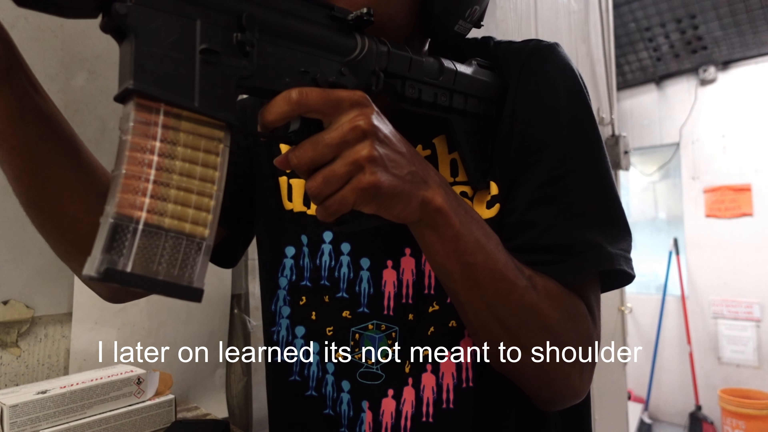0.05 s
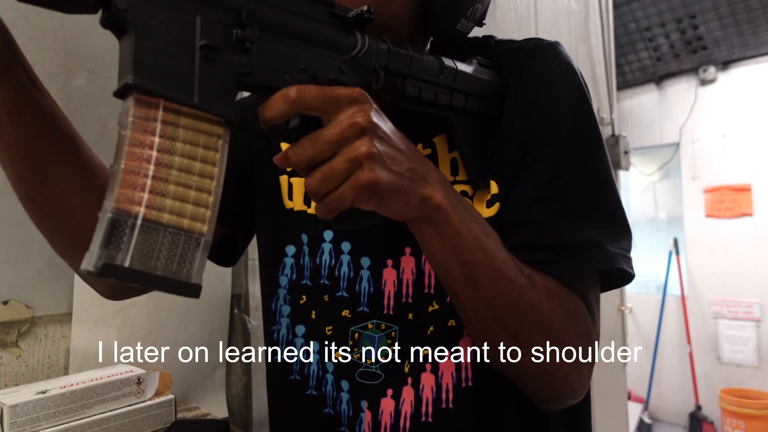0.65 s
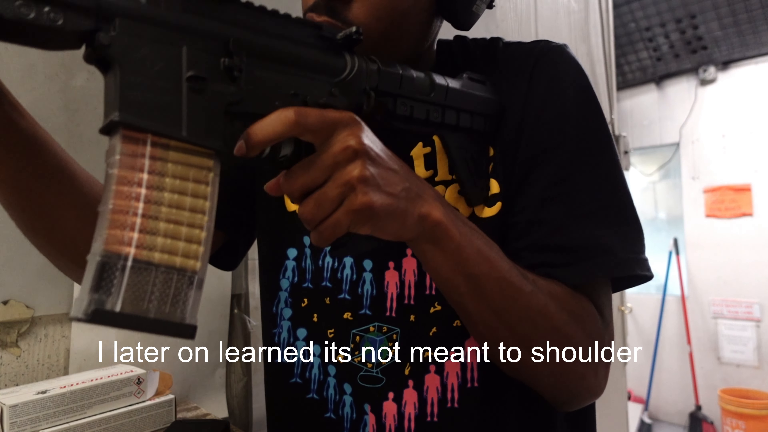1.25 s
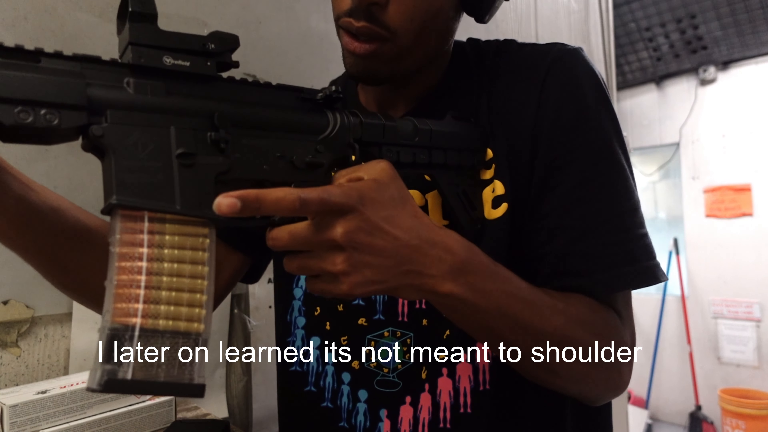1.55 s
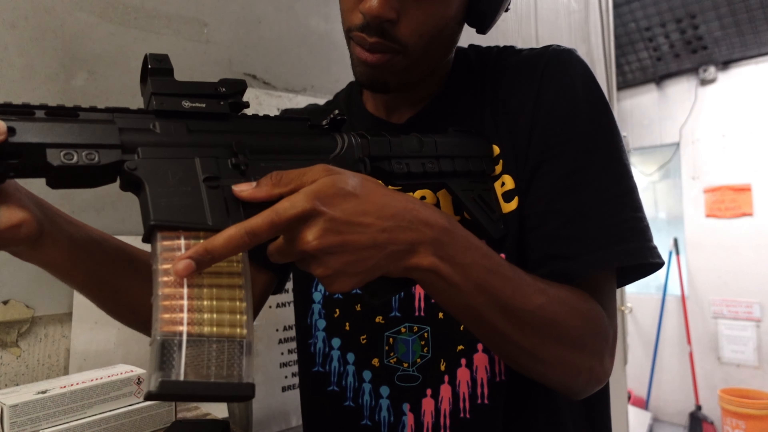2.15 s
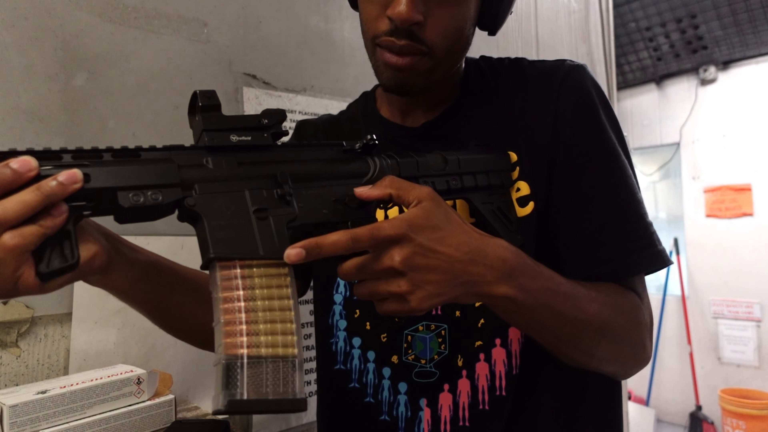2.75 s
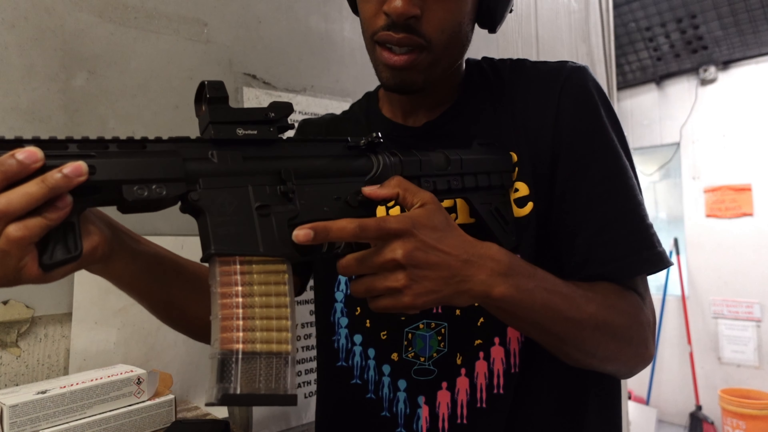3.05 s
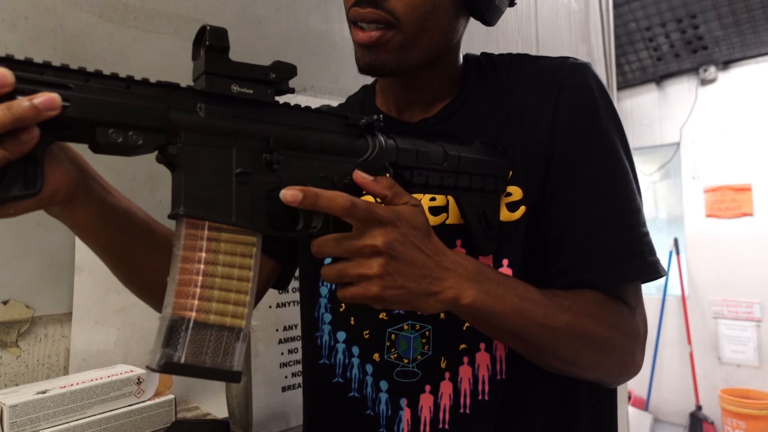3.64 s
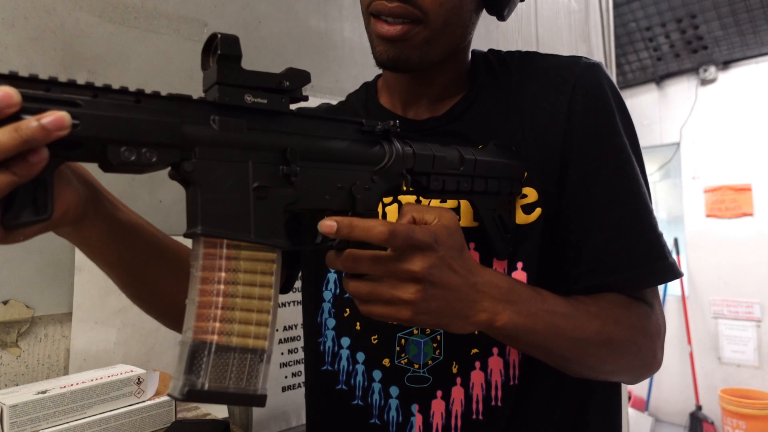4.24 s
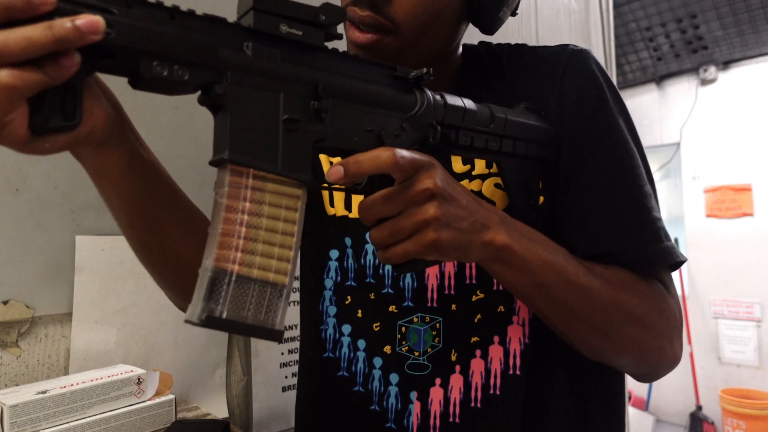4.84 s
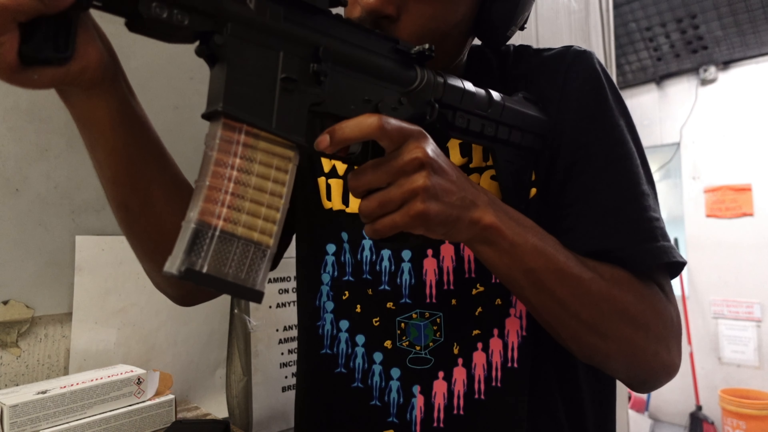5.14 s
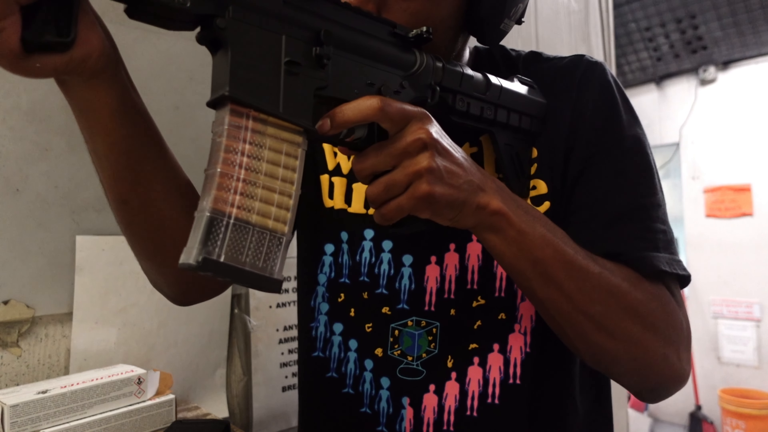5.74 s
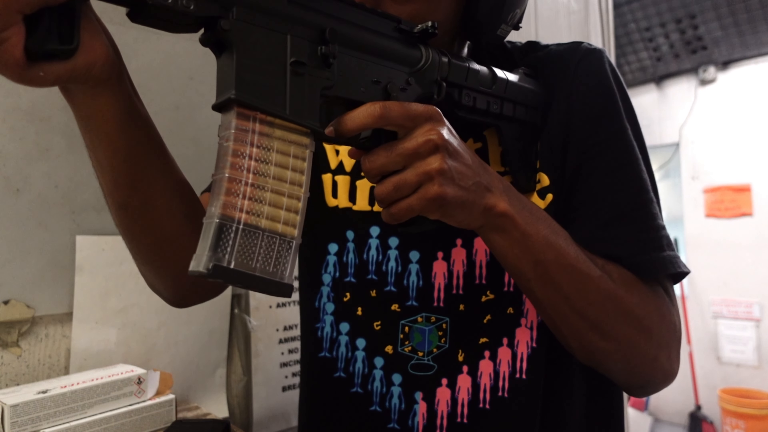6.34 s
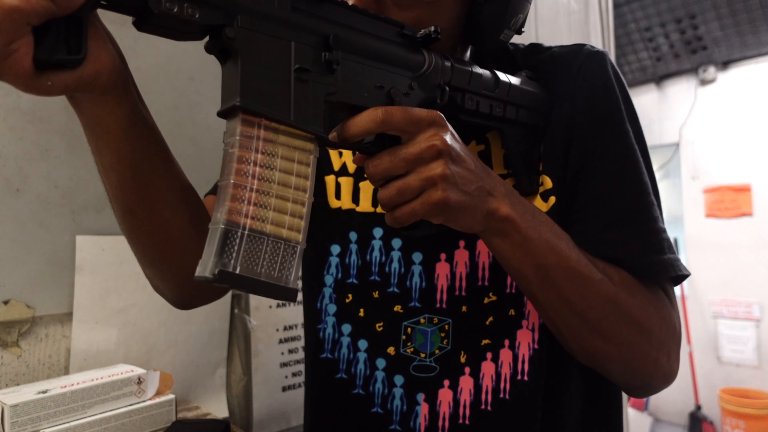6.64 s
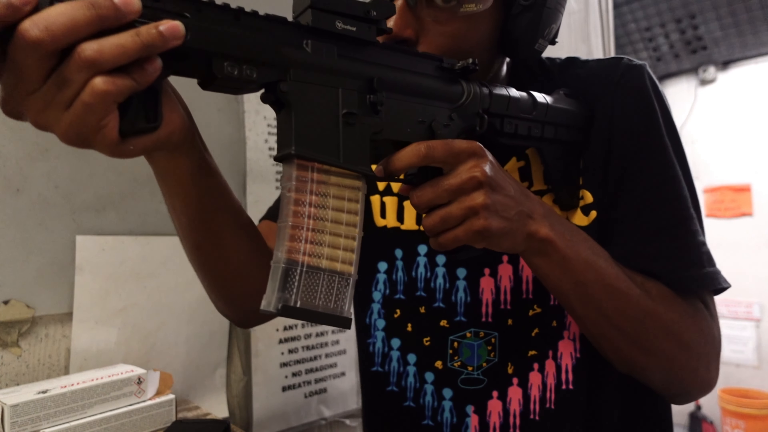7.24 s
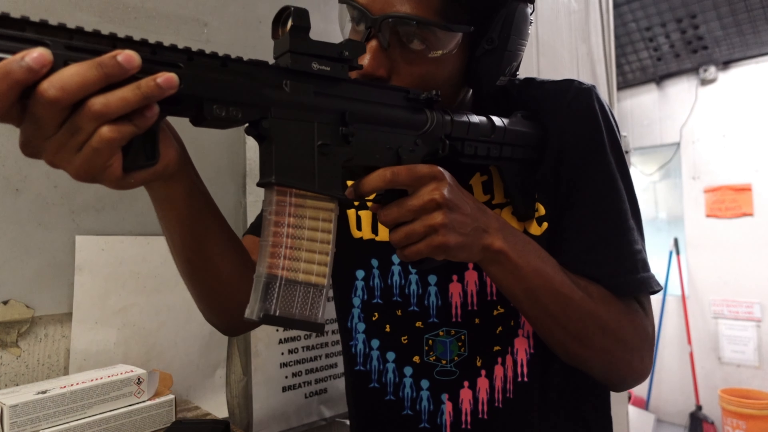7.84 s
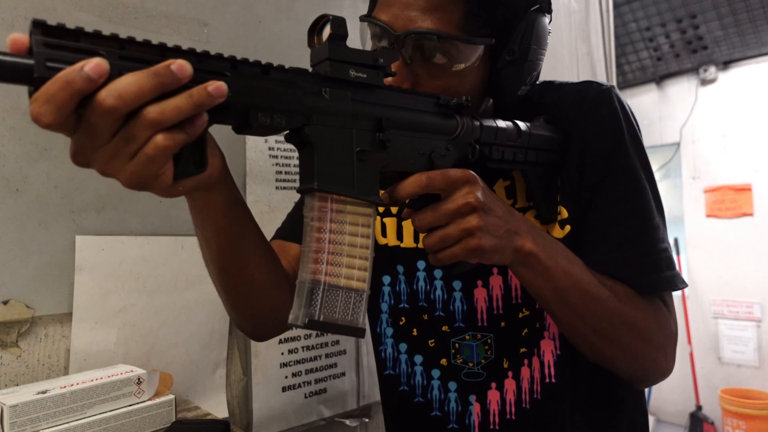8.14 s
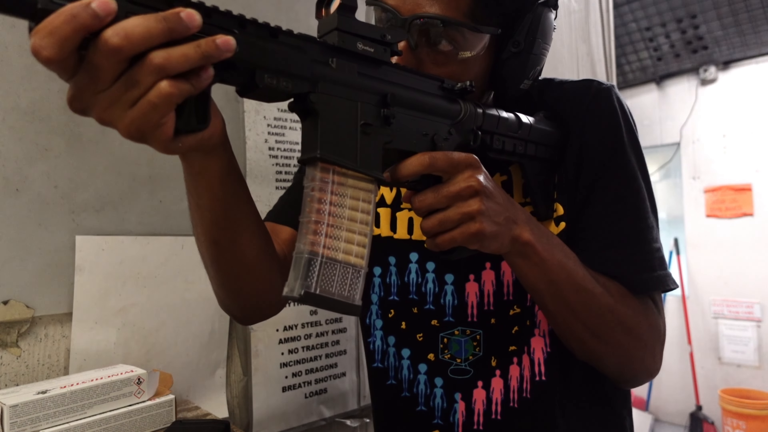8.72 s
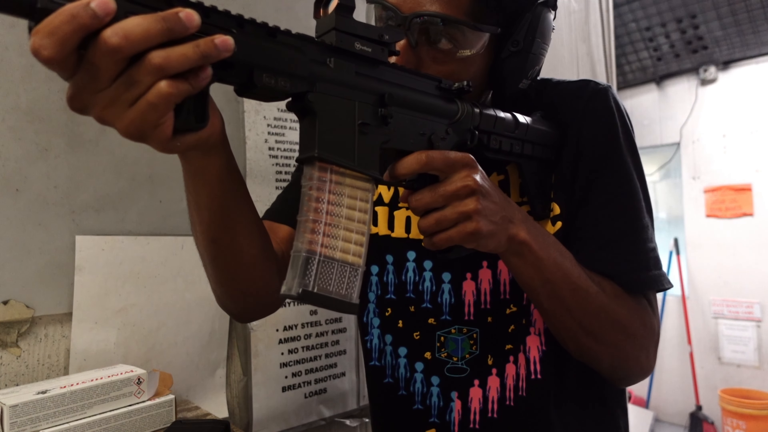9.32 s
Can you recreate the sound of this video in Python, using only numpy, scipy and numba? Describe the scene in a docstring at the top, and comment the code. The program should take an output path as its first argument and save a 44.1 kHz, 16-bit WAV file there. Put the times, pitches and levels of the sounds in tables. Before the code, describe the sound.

Over a low fan hum and rushing ducts, a rifle is handled with faint swishes and light metal ticks. A crisp click of the safety comes just before a very loud shot, and a second shot follows some three seconds later. The microphone sits beside the shooter in an indoor range, so both blasts distort and crackle for over a second as their long echoes die away.

```python
"""Ventilation hums and rushes in the booth of an indoor range, heard through one microphone by the shooter.
Close by, hands and shirt brush the rifle, small metal parts tick, and the safety snaps off.
Two shots follow, about three seconds apart. Each blast fills the concrete hall and overloads the
microphone for over a second; the recorder's gain control ducks and then creeps back up."""
import sys
import numpy as np
from scipy import signal
from scipy.fft import rfft, irfft, next_fast_len
from scipy.io import wavfile
from scipy.ndimage import map_coordinates
from numba import njit

SR = 44100
rng = np.random.default_rng(int(sys.argv[2]) if len(sys.argv) > 2 else 0)


def dump_mix(stems):
    """Bounce the given channels to the path in sys.argv[1] as a 16-bit WAV at rate SR."""
    frames = np.atleast_2d(stems).T  # one column per channel
    limited = np.clip(frames, -1, 1)  # hard clip at full scale
    pcm = np.round(limited * 32767).astype(np.int16)
    wavfile.write(sys.argv[1], SR, pcm)


N = 418068
TIME = np.arange(N) / SR

# Fan motor and blade tones in the booth. Each row: frequency in Hz, rms level at the microphone in dB.
FAN_TONES = [(120, -22.5), (178.7, -22), (240.3, -46), (298.8, -41), (419.9, -45.5), (445.8, -40),
             (479.5, -51), (559.9, -47), (720, -47.5), (840, -55.5), (893, -52.5)]
# Air rushing through the ducts. Each row: frequency in Hz, relative spectral level in dB.
DUCT_SPECTRUM = [(25, -11), (70, -7), (150, -2), (230, -2), (420, -3), (600, -7), (1000, -9), (2000, -16),
                 (4000, -26.5), (8500, -35), (11000, -44), (15500, -45)]
# Hands and shirt brushing the rifle. Each row: time of the peak in seconds, level in dB.
BRUSHES = [(.17, -55), (.70, -53), (.81, -50), (.86, -47), (1.11, -55), (1.654, -54), (2.945, -50),
           (3.39, -56), (7.468, -52)]
# Light metal ticks on the rifle. Each row: start in seconds, level in dB, pitch in Hz.
TICKS = [(.155, -45, 4050), (.79, -47, 7800), (.964, -44, 3500), (6.988, -45, 8250)]
# The safety lever leaves one detent and drops into the next. Each row: start in seconds, level in dB.
SAFETY_CONTACTS = [(3.8934, -9.5), (3.897, -24), (3.9012, -32)]
# The steel receiver ringing. Each row: frequency in Hz, relative level in dB, 60 dB decay in seconds.
RECEIVER_MODES = [(2080, -7, .055), (2640, -9, .045), (4011, -14, .06), (4800, -9, 0.062), (5400, -2, .045),
                  (6250, -5, .04), (7900, -6, .04), (9071, -14, .05), (9700, -13, .035), (14320, -10, .04)]
# The lever's dry metal snap. Each row: frequency in Hz, relative spectral level in dB.
SNAP_SPECTRUM = [(1200, -42), (2000, -5), (3500, -7), (5500, -1.5), (8000, -3), (11000, -9.5), (15000, -8)]
# Shots fired from the booth. Each row: start in seconds, blast level in dB, air surge level in dB.
SHOTS = [(4.6994, 35.5, 11), (7.8439, 33.5, 10.5)]
# The blast as it fills the hall. Each row: frequency in Hz, relative spectral level in dB.
BLAST_SPECTRUM = [(30, -10), (120, -2), (220, -4.5), (330, 1.1), (550, 3), (800, 0.9), (1100, -2.5),
                  (1600, -3.5), (3500, -6.5), (7000, -9), (15000, -27)]
# Reverberation of the concrete hall. Each row: frequency in Hz, 60 dB decay in seconds.
HALL_DECAY = [(60, 1.45), (250, 2.35), (600, 2.485), (1400, 2.28), (2800, 1.963), (5000, 1.577),
              (8000, 1.265), (15000, 0.42)]
# The tone of the microphone. Each row: frequency in Hz, gain in dB.
MIC_RESPONSE = [(100, 0.66), (1000, -1), (4000, -1.8), (8000, -2.7), (12000, -2), (15500, -3.5)]


def amp(db):
    """Decibels to gain."""
    return 10 ** (np.asarray(db) / 20)


def unit(x):
    """Scale to rms 1."""
    return x / np.sqrt(np.mean(x ** 2) + 1e-20)


def along(points, hz):
    """Read (Hz, value) points on a log frequency axis."""
    freqs, values = np.transpose(points)
    return np.interp(np.log(hz + 1), np.log(freqs + 1), values)


def filtered(x, response):
    """Filter x by a gain given as a function of Hz."""
    size = next_fast_len(len(x) + SR // 2)
    hz = np.fft.rfftfreq(size, 1 / SR)
    return irfft(rfft(x, size) * response(hz), size)[:len(x)]


def noise(spectrum, size):
    """Noise of rms 1 with a (Hz, dB) spectrum."""
    return unit(filtered(rng.standard_normal(size), lambda hz: amp(along(spectrum, hz))))


def band(centre_hz, octaves, size):
    """Noise of rms 1 in a bell around one frequency."""
    bell = lambda hz: np.exp(-.5 * (np.log2((hz + 1) / centre_hz) / octaves) ** 2)
    return unit(filtered(rng.standard_normal(size), bell))


def wobble(per_s):
    """A smooth random curve through per_s knots a second."""
    knots = rng.standard_normal(int(N * per_s / SR) + 4)
    return map_coordinates(knots, [TIME * per_s])


def add(track, start_s, sound):
    """Mix a sound into the track from start_s on."""
    start = max(round(start_s * SR), 0)
    track[start:start + len(sound)] += sound[:N - start]


def ventilation(rush_db=-32, waver_db=0.66, drift=0.027):
    """The room tone of the booth: faintly wavering fan tones over the rush of the ducts."""
    hum = np.zeros(N)
    for hz, db in FAN_TONES:
        peak = np.sqrt(2) * amp(db + waver_db * wobble(2.3))
        cycles = hz * TIME + rng.random()
        cycles += drift * hz / FAN_TONES[0][0] * wobble(4.5)  # higher tones drift further
        hum += peak * np.sin(2 * np.pi * cycles)
    rush = amp(rush_db + 0.45 * wobble(6.5)) * noise(DUCT_SPECTRUM, size=N)
    return hum + rush


def handling(rise_s=0.025, grain_db=2.3):
    """Skin and cloth rub the rifle near the microphone: soft grainy swishes as the grip shifts."""
    out, t = np.zeros(N), TIME[:SR // 2]
    stroke = t / rise_s * np.exp(1 - t / rise_s)  # swells quickly, fades slowly
    for peak_s, db in BRUSHES:
        friction = band(centre_hz=5700, octaves=0.64, size=len(t))
        add(out, peak_s - rise_s, amp(db) * stroke * friction)
    return out * amp(grain_db * wobble(250))


def metal_ticks(t60_s=0.15, rasp_db=-5):
    """Small parts of the rifle touch and ring faintly, all equally briefly."""
    out, t = np.zeros(N), TIME[:SR // 2]
    for start_s, db, hz in TICKS:
        ring = np.sin(2 * np.pi * hz * t)
        rasp = amp(rasp_db) * band(hz, octaves=0.6, size=len(t))
        add(out, start_s, amp(db - 60 * t / t60_s) * (ring + rasp))
    return out


def safety_lever(snap_t60_s=0.013, ring_db=-8, booth_db=-27, booth_t60_s=0.35):
    """Each contact of the lever snaps and rings the receiver; the booth answers briefly."""
    out, t = np.zeros(N), TIME[:SR // 2]
    fade = lambda t60_s: amp(-60 * t / t60_s)
    for start_s, db in SAFETY_CONTACTS:
        ring = sum(amp(mode_db + rng.normal(0, 2)) * fade(t60_s) * np.sin(2 * np.pi * hz * t)
                   for hz, mode_db, t60_s in RECEIVER_MODES)
        snap = noise(SNAP_SPECTRUM, size=len(t)) * (fade(snap_t60_s) + amp(booth_db) * fade(booth_t60_s))
        add(out, start_s, amp(db) * (snap + amp(ring_db) * ring))
    return out


def hall(x, build_cycles=70, build_depth=0.7):
    """Low notes take longer to build up in the concrete hall; air eats the treble first."""
    hz, t, spectra = signal.stft(x, SR, nperseg=1024)
    bloom = 1 - build_depth * np.exp(-t * hz[:, None] / build_cycles)
    decay = amp(-60 * t / along(HALL_DECAY, hz)[:, None])
    return signal.istft(spectra * bloom * decay, SR, nperseg=1024)[1][:len(x)]


def rifle_shots(front_db=10, front_s=0.00039, surge_peak_s=0.41, surge_width_s=0.26):
    """Each shot, from close by: a shock front, the hall's roar, and a slow surge of air along the lanes."""
    out, t = np.zeros(N), TIME[:3 * SR]
    front = amp(front_db) * (1 - t / front_s) * np.exp(-t / front_s)  # overpressure, then suction
    swell = np.exp(-.5 * ((t - surge_peak_s) / surge_width_s) ** 2)
    for start_s, blast_db, surge_db in SHOTS:
        roar = hall(noise(BLAST_SPECTRUM, size=len(t)))
        surge = swell * band(centre_hz=6.9, octaves=1.38, size=len(t))
        add(out, start_s, amp(blast_db) * (front + roar) + amp(surge_db) * surge)
    return out


def overload(x, rail=1.656):
    """The microphone hits its rails and flattens the wave; the last peaks to touch them crackle."""
    oversampled = signal.resample_poly(x, 4, 1)
    return signal.resample_poly(np.clip(oversampled, -rail, rail), 1, 4)


def level(x, window_s=0.0016):
    """Running rms level in dB."""
    keep = np.exp(-1 / (window_s * SR))
    power = signal.lfilter([1 - keep], [1, -keep], x ** 2)
    return 10 * np.log10(power + 1e-12)


@njit
def gain_control(level_db, ceiling_db, start_db, attack_s, recovery_db_per_s):
    """The recorder's gain in dB: it ducks when the level passes the ceiling, then climbs back to 0."""
    out, gain_db = np.empty(len(level_db)), start_db
    for i in range(len(level_db)):
        excess_db = max(level_db[i] + gain_db - ceiling_db, 0.)
        gain_db = min(gain_db + recovery_db_per_s / SR - excess_db / (attack_s * SR), 0.)
        out[i] = gain_db
    return out


def scene():
    """The sound at the microphone's place in the booth, the same in both channels."""
    booth = rifle_shots() + ventilation() + safety_lever() + handling() + metal_ticks()
    return np.tile(booth, (2, 1))


def record(dry, compressor_share=0.57, low_cut_hz=25, top_hz=15850):
    """Microphone and recorder: overload, slow gain control, fast compressor, bass cut, clipping, tone."""
    x = overload(dry[0])
    slow_db = gain_control(level(x), ceiling_db=-3.5, start_db=-6.5, attack_s=0.23, recovery_db_per_s=1.83)
    x = x * amp(slow_db)
    fast_db = gain_control(level(x), ceiling_db=-10, start_db=0, attack_s=0.00067, recovery_db_per_s=30.5)
    x = x * amp(compressor_share * fast_db)
    x = signal.lfilter(*signal.butter(1, low_cut_hz, "high", fs=SR), x)  # the flat tops sag and wander
    x = np.clip(x, -1, 1)
    steep_low_pass = lambda hz: 1 / np.sqrt(1 + (hz / top_hz) ** 240)
    x = filtered(x, lambda hz: amp(along(MIC_RESPONSE, hz)) * steep_low_pass(hz))
    return np.tile(x, (2, 1))


dry = scene()
out = record(dry)
dump_mix(out)
```